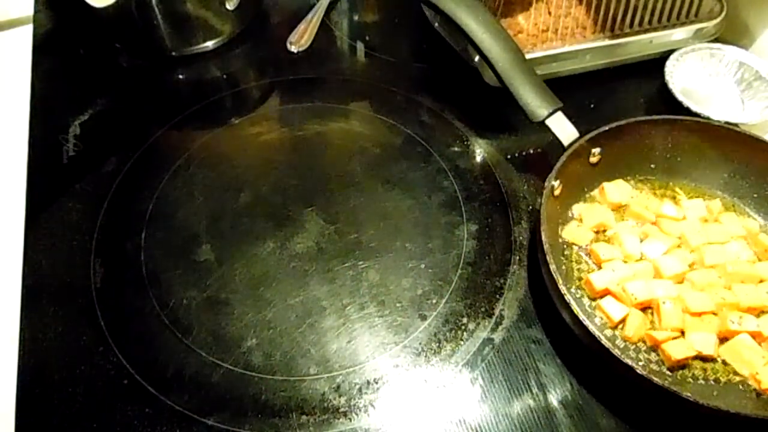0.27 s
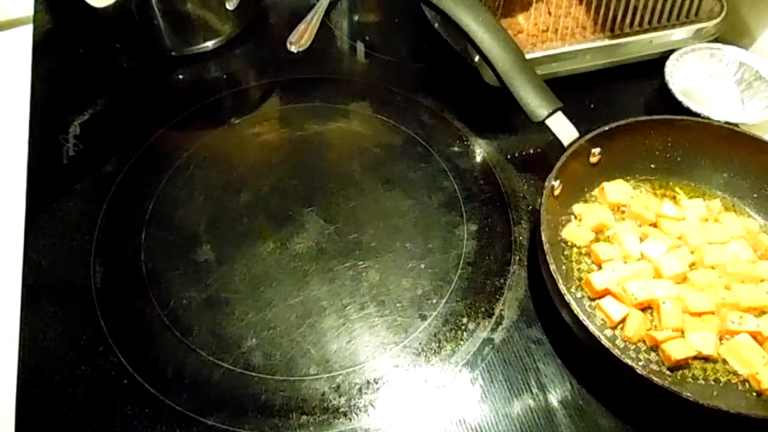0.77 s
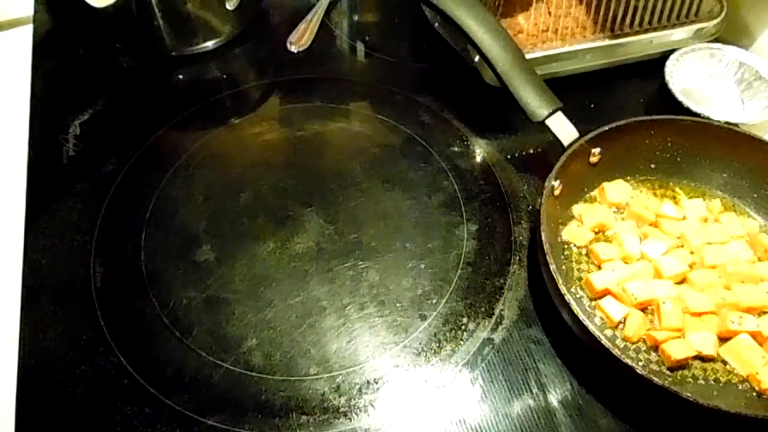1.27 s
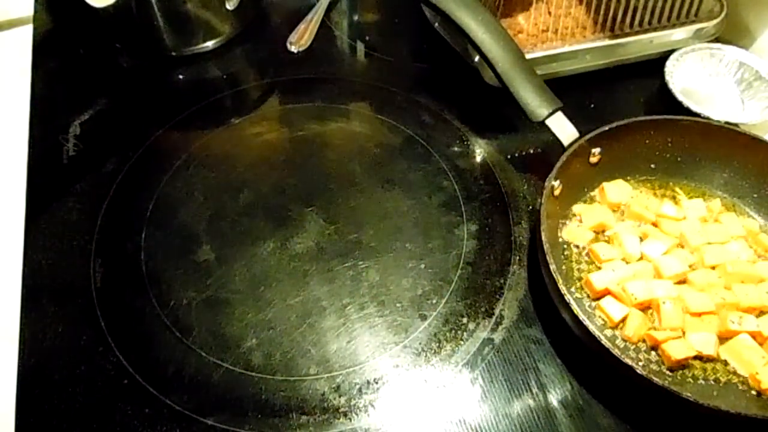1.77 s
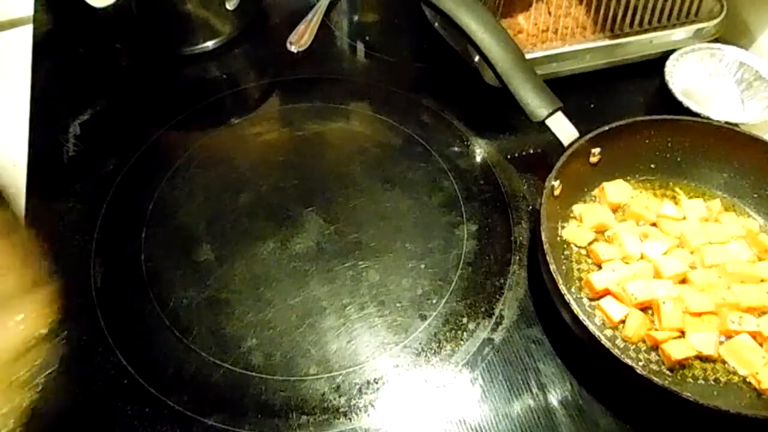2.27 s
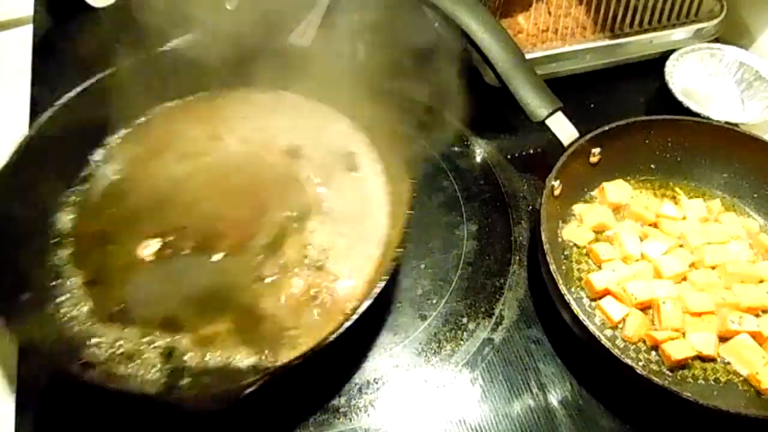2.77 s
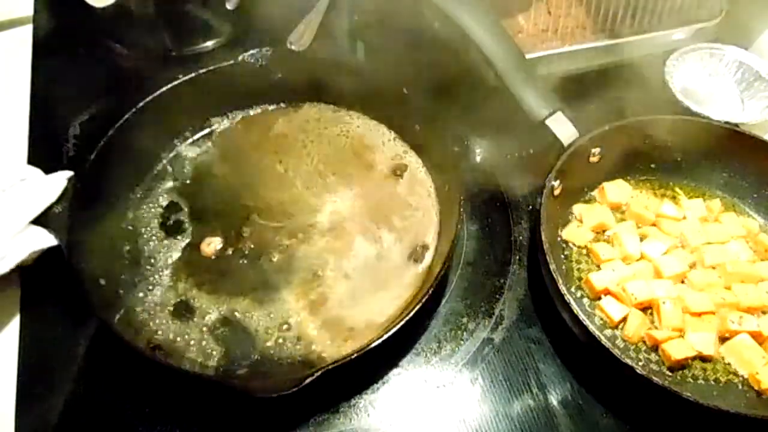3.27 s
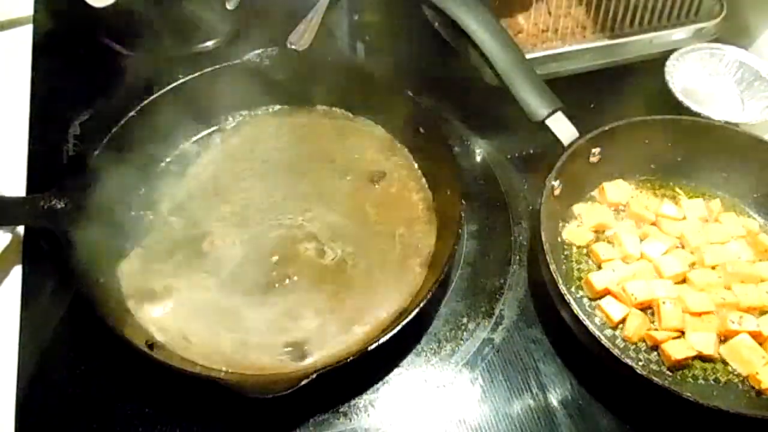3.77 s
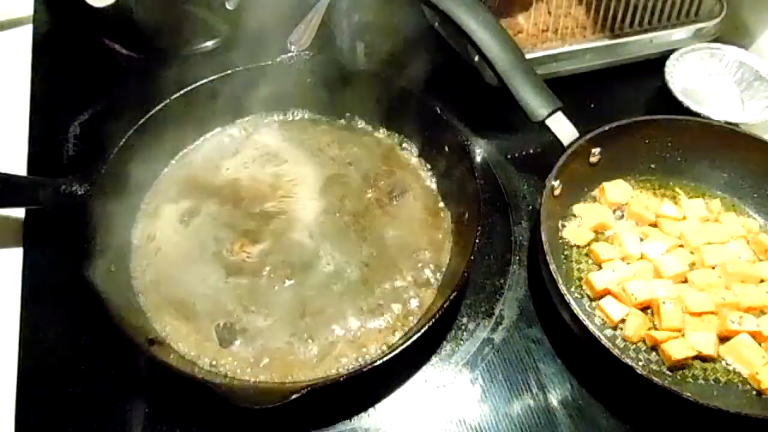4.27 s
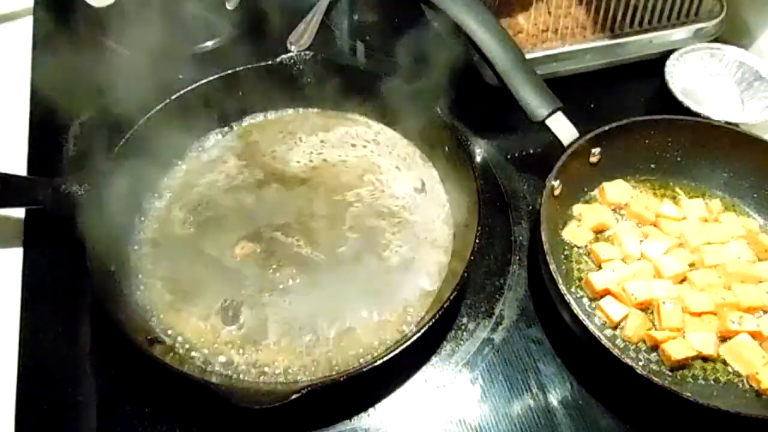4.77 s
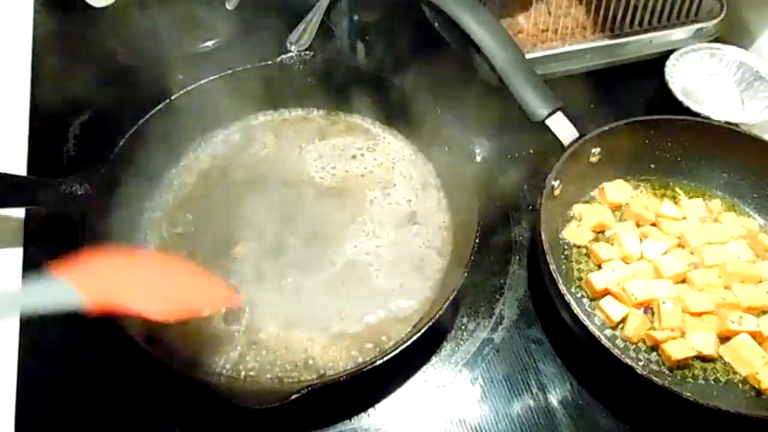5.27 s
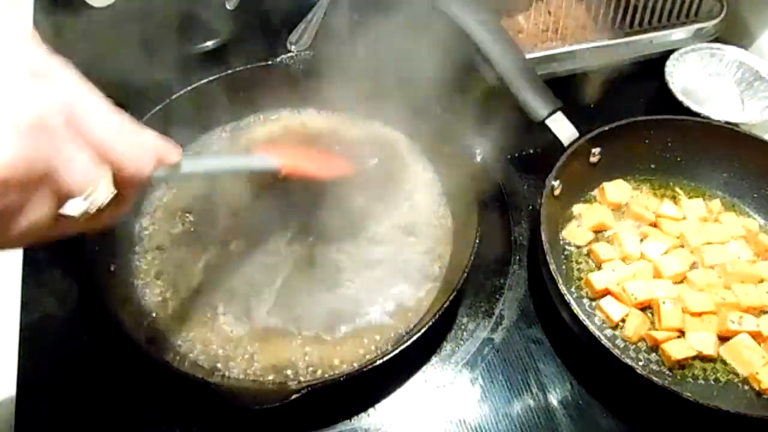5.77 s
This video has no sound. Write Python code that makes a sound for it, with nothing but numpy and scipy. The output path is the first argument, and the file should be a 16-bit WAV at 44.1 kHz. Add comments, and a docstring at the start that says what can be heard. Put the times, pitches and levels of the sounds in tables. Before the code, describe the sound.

From the start, a dense bright hiss and bubbling seethe of water in a very hot iron skillet, crackling with tiny spits, over fine oil ticks from a second pan and a low, wavering fan rumble. Hollow running water sounds until about 1.05 seconds, then stops, with a brief faint gurgle near 1.4. The sizzle weakens a little, then swells around 2.5 as the pan passes close. A very sharp spit cracks at 2.7. At 3.04 the skillet lands on the glass stove with a heavy dull thump; thin high steam squeals follow near 3.2 and a softer second thump at 3.3. Spits continue, the bubbling dips near 3.9 and the hiss gradually dies down. From about 5.2 soft plops mark a spoon; from 5.7 to 6 stirring brings short hiss flares and a small squeal. Close, dry, slight small-room echo, both channels identical.

```python
"""Water hisses and spits on a very hot iron skillet, above frying in a second pan and a droning fan.
Running water sounds hollow until it is shut off; the skillet then lands on a glass stove with two main thumps.
Steam squeals, the hiss dies down and a soft spoon starts to stir.
Hiss and spits are shaped noise, bubbles are random clicks, thumps are ringing tones of the stove top.
One close microphone, the same in both channels, with a gain control that recovers slowly."""
import sys
import numpy as np
from scipy import signal
from scipy.fft import rfft, irfft
from scipy.io import wavfile
from scipy.ndimage import uniform_filter1d

SR = 44100
rng = np.random.default_rng(int(sys.argv[2]) if len(sys.argv) > 2 else 0)


def dump(signal):
    """Clip the signal to [-1, 1] and save it as 16-bit WAV at the path in sys.argv[1]."""
    limited = np.clip(np.atleast_2d(signal).T, -1, 1)
    pcm = np.round(limited * 32767).astype(np.int16)
    wavfile.write(sys.argv[1], SR, pcm)


N = 264847
TIME = np.arange(N) / SR

# the pan starts to be lowered; a little later the boil starts to cool
LOWERED_S, COOLING_STARTS_S = 2.57, 2.88
# the pan swings close: when and for how long
PASS_AT_S, PASS_S = 2.46, 0.27
# the water is shut off: when, and how long the flow takes to stop
SHUT_S, SHUTTING_S = 1.05, 0.053


def gain_of(db):
    """Turns decibels into a factor."""
    return 10 ** (np.asarray(db) / 20)


def evened(x):
    """Scales a signal to an average strength (rms) of one."""
    return x / np.sqrt(np.mean(x ** 2) + 1e-20)


def ramp(t, start, length):
    """Rises in a straight line from zero to one."""
    return np.clip((t - start) / length, 0, 1)


def hump(t, at, length):
    """Swells to one and sinks again around a moment."""
    return np.exp(-((t - at) / length) ** 2)


def add(mix, start_s, sound):
    """Mixes a sound in at a time, cutting it off at the end."""
    part = mix[max(round(start_s * SR), 0):][:len(sound)]
    part += sound[:len(part)]


def coloured(x, points):
    """Shapes the spectrum of x by a table of pitch and level, at an rms of one."""
    pitch_hz, level_db = np.transpose(points)
    bins = np.fft.rfftfreq(len(x), 1 / SR)
    shape_db = np.interp(np.log(bins + 1), np.log(pitch_hz), level_db)
    return evened(irfft(rfft(x) * gain_of(shape_db), len(x)))


def wander(rate, size=N):
    """Smooth random drift of rms one, mostly slower than rate in Hz."""
    bins = np.fft.rfftfreq(size, 1 / SR)
    slow = np.exp(-(bins / rate) ** 2) * (bins > 0)
    return evened(irfft(rfft(rng.standard_normal(size)) * slow, size))


def bursts(per_s, spread_db):
    """Random clicks of bursting bubbles, most small and a few large."""
    size = gain_of(spread_db * np.minimum(rng.exponential(1, N), 5))
    happens = rng.random(N) < per_s / SR
    return evened(size * rng.choice([-1, 1], N) * happens)


def bump(hz, octaves, size):
    """A rounded band around one pitch with gentle skirts, for a sound of this many samples."""
    away = np.log2((np.fft.rfftfreq(size, 1 / SR) + 1) / hz) / octaves
    return evened((1 + (away / 2) ** 2) ** -2)


def puff(db, hz, octaves, rise_s, crack=0):
    """Noise around one pitch that swells and dies, with an optional sharp crack near its start."""
    t = np.arange(SR // 5) / SR
    band = bump(hz, octaves, len(t))
    u = t / max(rise_s, 1e-4)
    swell = u * np.exp(1 - u)  # reaches one after rise_s
    rush = irfft(rfft(rng.standard_normal(len(t))) * band, len(t))
    rush = evened(rush * swell) * np.sqrt(np.mean(swell ** 2))
    tick = np.roll(irfft(band, len(t)), 24)
    return gain_of(db) * (rush + crack * tick / tick.max())


def puffs(rows, crack):
    """Plays a table of puffs, each at its own time."""
    out = np.zeros(N)
    for start_s, *shape in rows:
        add(out, start_s, puff(*shape, crack=crack))
    return out


# how hard the water boils while the pan is carried, before cooling and layer levels
# columns: time_s [s], level_db [dB]
BOIL_STRENGTH = [(0, -28.5), (.2, -27), (.5, -30), (.85, -31), (1.15, -33.5), (1.65, -33), (2.25, -30),
                 (2.7, -30.5)]


def vigour(cooling_db=4.5, cooling_s=1.23):
    """Strength of the boil in dB: it goes up and down while carried, then sinks as the iron cools."""
    time_s, level_db = np.transpose(BOIL_STRENGTH)
    cooled = 1 - np.exp(-np.maximum(TIME - COOLING_STARTS_S, 0) / cooling_s)
    return np.interp(TIME, time_s, level_db) - cooling_db * cooled


def sloshing(fed_db=-0.1, pass_db=1.4, lull_at_s=3.93, lull_s=0.26, lull_db=2.5):
    """Level change of the larger bubbles in dB: running water, a close pass, a lull as water slops back."""
    fed = fed_db * (1 - ramp(TIME, SHUT_S, SHUTTING_S))
    lull = lull_db * hump(TIME, lull_at_s, lull_s)
    return fed + pass_db * hump(TIME, PASS_AT_S, PASS_S) - lull


# resonances of the pan held close, then of the pan on the stove, before their changing shares
# columns: pitch_hz [Hz], width_hz [Hz], boost_db [dB]
HELD_PAN = [(700, 40, 9), (915, 120, 0.5), (1000, 70, 1), (1180, 98, -3), (1333, 72, 8), (1580, 150, 2),
            (1910, 120, -1), (2600, 87, -1.5), (2870, 68, 4), (5670, 130, 1)]
SEATED_PAN = [(430, 45, 5), (780, 76, 10), (1146, 380, -4.5), (1420, 160, 5), (2025, 98, 4), (2670, 450, 3),
              (4600, 880, -3.5), (7870, 180, 12), (9520, 250, 1)]


def hollow(hz, t, near_s=1.0, seating_s=1, held_share=0.94, pass_share=0.46, seated_before=0.4):
    """Pan resonances in dB: the held ones grow as it nears, then give way to the seated ones."""
    shapes = [sum(db / (1 + (2 * (hz - f) / width) ** 2) for f, width, db in modes)
              for modes in (HELD_PAN, SEATED_PAN)]
    down = ramp(t, LOWERED_S, seating_s)
    near = ramp(t, 0, near_s) * held_share + pass_share * hump(t, PASS_AT_S, PASS_S)
    shares = near * (1 - down), seated_before * (1 - down) + down
    return sum(np.outer(shape, share) for shape, share in zip(shapes, shares))


def patchy(x, depth_db, ring=lambda hz, t: 0):
    """Patches of foam swell and fade at their own pitches; ring adds resonances in dB."""
    hz, t, z = signal.stft(x, SR, nperseg=1024, noverlap=768)
    patches = uniform_filter1d(rng.standard_normal(z.shape), size=7, axis=1)  # smooth in time
    patches = uniform_filter1d(patches, size=16, axis=0)  # smooth in pitch
    z = z * gain_of(depth_db * evened(patches) + ring(hz, t))
    return signal.istft(z, SR, nperseg=1024, noverlap=768)[1][:N]


# colour of the fizz of tiny bubbles, then of the seething of larger ones
# columns: pitch_hz [Hz], relative_level_db [dB per Hz]
FIZZ_COLOUR = [(1500, -26.5), (3500, -7), (5200, -3.5), (6500, 0.5), (8000, 1), (9500, 0.2), (11500, -1.5),
               (13000, -4.5), (14500, -11.5), (16000, -19)]
SEETHE_COLOUR = [(120, 0.5), (250, -15.5), (480, -9.5), (750, -6.5), (1100, 0), (1400, -2), (2200, 2),
                 (3200, 1.5), (4500, 2.5), (6500, 0), (11000, -13)]


def boiling(fizz_db=1.0, seethe_db=-4.0, fizz_grain=0.73, seethe_grain=0.71, flash_db=0.5, flash_s=0.004):
    """Countless bubbles burst over a rush of steam, which jumps at random as water touches dry iron."""
    level = vigour()
    fine = fizz_grain * bursts(per_s=7000, spread_db=2.0) + rng.standard_normal(N) * 0.74
    coarse = seethe_grain * bursts(per_s=2500, spread_db=1.5) + rng.standard_normal(N) * 0.62
    fizz = patchy(coloured(fine, FIZZ_COLOUR), depth_db=1.0)
    fizz = fizz * gain_of(level + fizz_db)
    seethe = patchy(coloured(coarse, SEETHE_COLOUR), depth_db=0.85, ring=hollow)
    seethe = seethe * gain_of(level + sloshing() + seethe_db)
    touches = abs(bursts(per_s=45, spread_db=3.0))
    flashes = signal.lfilter([1], [1, -np.exp(-1 / (flash_s * SR))], touches)  # sudden rise, short fade
    return (fizz + seethe) * gain_of(flash_db * evened(flashes - flashes.mean()))


# hollow tones of running water, before the level of the flow
# columns: pitch_hz [Hz], width_hz [Hz], level_db [dB rms]
WATER_TONES = [(458, 19, -55.5), (526, 19, -53.5), (585, 22, -59.5), (840, 37, -59.5)]


def running(flow_db=0.5, gurgle_at_s=1.44, gurgle_s=0.17, gurgle_db=-4):
    """Turbulent water excites narrow, hollow resonances until shut off, then gurgles once more."""
    bins = np.fft.rfftfreq(N, 1 / SR)
    tones = np.zeros(N)
    for hz, width, db in WATER_TONES:
        band = (1 + ((bins - hz) / width) ** 2) ** -2
        tones += gain_of(db) * evened(irfft(rfft(rng.standard_normal(N)) * band, N))
    flow = gain_of(flow_db) * (1 - ramp(TIME, SHUT_S, SHUTTING_S))
    return tones * (flow + gain_of(gurgle_db) * hump(TIME, gurgle_at_s, gurgle_s))


# colour of the oil in the second pan
# columns: pitch_hz [Hz], relative_level_db [dB per Hz]
OIL_COLOUR = [(500, -20), (1500, -11), (4000, -24), (8000, 14.5), (12000, 10), (16000, 8)]


def frying(level_db=-43, scatter=0.28, ring_s=0.0033):
    """Sparse ticks of hot oil, each scattered briefly by the pan wall."""
    t = np.arange(SR // 40) / SR
    tick = scatter * rng.standard_normal(len(t)) * np.exp(-t / ring_s) + (t == 0)
    ticks = signal.oaconvolve(bursts(per_s=260, spread_db=6.0), tick)[:N]
    return gain_of(level_db) * coloured(ticks, OIL_COLOUR)


# colour of the air rumbling through the extractor fan
# columns: pitch_hz [Hz], relative_level_db [dB per Hz]
FAN_RUMBLE = [(8, -14), (24, -0.5), (45, 1.5), (68, -3.5), (95, -0.5), (116, 8), (132, 0), (146, -7.5),
              (190, -17.5), (300, -16.5), (700, -20), (2000, -39)]
# steady tones of the fan, before its overall level
# columns: pitch_hz [Hz], level_db [dB rms]
FAN_TONES = [(83, -59), (96, -54.5), (119.5, -56), (138, -60), (159, -85)]


def fan(waver_hz=0.81, rumble_db=-48, overall_db=1.8):
    """Rumbling air, made of low noise, with a few tones that waver in pitch."""
    tones = np.zeros(N)
    for hz, db in FAN_TONES:
        pitch_hz = hz + waver_hz * wander(rate=3.6)
        tones += gain_of(db) * evened(np.sin(2 * np.pi * np.cumsum(pitch_hz) / SR))
    air = gain_of(rumble_db) * coloured(rng.standard_normal(N), FAN_RUMBLE)
    return (air + tones) * gain_of(overall_db)


def spatter(per_s=12, ends_s=5.2, level_db=-30, spread_db=2.0, centre_hz=8400, octaves=0.59, rise_s=0.0017):
    """Small drops burst into steam at uneven intervals, each with its own strength, pitch, width and speed."""
    rows = []
    draws = rng.uniform(-1, 1, (int(per_s * ends_s), 5))
    for k, (early, loud, high, wide, slow) in enumerate(draws):
        start_s = (k + 1 + early) / per_s
        pitch_hz = centre_hz * 2 ** (.5 * high)
        rows.append((start_s, level_db + spread_db * loud, pitch_hz, octaves * 2 ** wide, rise_s * 2 ** slow))
    return puffs(rows, crack=3.6)


# water flooding fresh hot iron, on its own or pushed by the spoon
# columns: start_s [s], length_s [s], level_db [dB at the peak], pitch_hz [Hz], spread_octaves [octaves]
FLARE_EVENTS = [(0.636, 0.24, -33.5, 4600, 0.63), (.87, .15, -32.5, 5460, .32), (3.17, 0.13, -33, 1790, 2),
                (5.66, 0.18, -32, 6800, 0.53), (5.779, 0.13, -31.5, 5600, 0.58),
                (5.96, 0.1, -31, 7200, 0.46)]


def flares():
    """Water on fresh hot iron gives brief swells of hiss around one pitch."""
    out = np.zeros(N)
    for start_s, length_s, db, hz, octaves in FLARE_EVENTS:
        size = round(length_s * SR)
        hiss = irfft(rfft(rng.standard_normal(SR)) * bump(hz, octaves, SR), SR)
        swell = np.sin(np.linspace(0, np.pi, size))
        add(out, start_s, gain_of(db) * evened(hiss[:size]) * swell)
    return out


# single drops that burst into steam
# columns: start_s [s], level_db [dB of the rush], pitch_hz [Hz], spread_octaves [octaves], rise_s [s]
SPIT_EVENTS = [(0.6464, -27.5, 6440, .6, 0.0095), (0.81, -27, 6460, .75, 0.01),
               (1.4167, -25.5, 7360, .55, .0056), (1.7254, -31, 3900, 0.25, .004),
               (1.8644, -26.5, 7800, .8, 0.0086), (2.0821, -25, 9000, 0.63, .009),
               (2.1952, -28.5, 3000, 1.4, 0.0044), (2.709, -11.5, 9900, 0.4, 0.0021),
               (2.8191, -23, 8850, 0.49, .0024), (2.9441, -24, 11200, .7, 0.003),
               (3.047, -20.5, 6500, 1.5, 0.0035), (3.5832, -23.5, 5900, 1.4, 0.005),
               (3.9074, -24.5, 9100, 1.3, 0.0036), (3.9591, -20, 9600, 0.2, 0.00085),
               (4.3942, -25.5, 4300, 1.7, 0.0035), (4.8016, -25.5, 8900, 0.82, .003),
               (4.8823, -26, 8550, 0.52, 0.0027)]


def spits():
    """Each drop bursts into a short rush of steam with a crack."""
    return puffs(SPIT_EVENTS, crack=2.0)


# soft knocks and plops of handling and stirring
# columns: start_s [s], level_db [dB at the peak], pitch_hz [Hz], spread_octaves [octaves]
PLOP_EVENTS = [(1.86, -46, 486, 0.38), (1.97, -45, 470, .5), (2.198, -39.5, 960, 0.059),
               (5.178, -46, 430, .55), (5.452, -49, 270, 0.3), (5.588, -46, 440, 0.045)]


def plops(rise_s=0.0087):
    """Soft low puffs of noise without a crack."""
    return puffs([(*row, rise_s) for row in PLOP_EVENTS], crack=0)


# the pan meets the stove, rocks and settles with its full weight
# columns: start_s [s], relative_level_db [dB], contact_s [s]
CONTACTS = [(3.043, -2, .0017), (3.153, -21, 0.0056), (3.266, -18, 0.0052), (3.294, -15, 0.0022),
            (3.305, -20.5, 0.0037), (3.31, -10.5, .022)]
# what the stove top rings with, before the contact and the low cut shape it
# columns: pitch_hz [Hz], relative_level_db [dB], fade_s [s to fall by 60 dB]
STOVE_MODES = [(36.8, -18.5, 0.44), (75.4, -23, 0.29), (91.3, 2.5, 0.086), (119, -22, 0.22),
               (142, -16, .14), (172.4, -19.5, 0.22), (196.5, -23, 0.29), (222.6, -21.5, 0.25),
               (266, -15.5, 0.127), (267, -12, 0.066), (343, -32, 0.097), (388, -30, 0.35),
               (446, -24, 0.19), (500, -5, 0.029), (654, -8.5, 0.053), (693, -29, .08), (830, -21, .1),
               (1044, -23, .05)]


def thumps(grit_db=-26, grit_hz=1500, grit_octaves=2.4, grit_rise_s=0.0074, lowest_hz=32, spread_s=0.00077):
    """Each contact pushes the stove top into its modes; longer ones are duller, and iron grates on glass."""
    t, out = np.arange(SR // 2) / SR, np.zeros(N)
    ring = sum(gain_of(db - 60 * t / fade_s) * np.cos(2 * np.pi * hz * t) for hz, db, fade_s in STOVE_MODES)
    ring = ring * (1 - np.exp(-t / spread_s))  # the blow takes a moment to cross the plate
    low_cut = signal.butter(2, lowest_hz, "highpass", fs=SR, output="sos")
    ring = signal.sosfilt(low_cut, ring)  # a plate radiates no slow push
    for start_s, db, contact_s in CONTACTS:
        push = np.sin(np.pi * np.minimum(t / contact_s, 1)) ** 2
        add(out, start_s, gain_of(db) * signal.fftconvolve(ring, push / push.sum())[:len(t)])
        add(out, start_s, puff(db + grit_db, grit_hz, grit_octaves, grit_rise_s))
    return out


# thin squeals of steam squeezed under the pan and the spoon
# columns: start_s [s], length_s [s], level_db [dB rms], pitch_hz [Hz at the top of the arch, before wavering]
SQUEAL_EVENTS = [(3.044, .04, -39.5, 13050), (3.178, .028, -36.5, 12800), (3.21, .032, -33, 12900),
                 (3.237, .045, -33, 12600), (5.818, 0.048, -34.5, 8850), (5.82, 0.078, -39.5, 4170),
                 (5.875, .06, -42, 4490)]


def squeals(waver=0.023, arch_depth=0.0293):
    """Squeezed steam whistles unsteadily; the pitch arches up and back by a share of itself."""
    out = np.zeros(N)
    for start_s, length_s, db, top_hz in SQUEAL_EVENTS:
        arch = abs(np.sin(np.linspace(0, np.pi, round(length_s * SR))))
        unsteady = 1 + waver * wander(rate=730, size=8192)[:len(arch)]
        pitch_hz = top_hz * (1 - arch_depth * (1 - arch)) * unsteady
        swell = np.sqrt(arch) * (1 + .6 * wander(rate=250, size=8192)[:len(arch)])
        whistle = np.sin(2 * np.pi * np.cumsum(pitch_hz) / SR)
        add(out, start_s, gain_of(db) * evened(whistle * swell))
    return out


def rebound(x, strength=0.076, drift_s=.00007):
    """Echoes off stove top, backsplash and hood ripple the spectrum, shifting as the water moves about."""
    delays_s = (.00305, .0043, .0071, .0118, .0163)
    echoes = sum(np.interp(TIME - delay - drift_s * wander(rate=0.53), TIME, x) for delay in delays_s)
    return x + strength * echoes


def kitchen(x, wet_db, fade_s):
    """Adds the short echo of a small room, as fading noise; fade_s is the time to fall by 60 dB."""
    t = np.arange(SR // 3) / SR
    tail = rng.standard_normal(len(t)) * gain_of(-60 * t / fade_s) * (t > .004)
    return x + gain_of(wet_db) * signal.fftconvolve(x, tail / np.linalg.norm(tail))[:N]


def scene():
    """Everything reaches one microphone and fills both channels."""
    events = spatter() + spits() + plops() + thumps() + squeals()
    hiss = rebound(boiling() + flares())
    mono = hiss + running() + frying() + fan() + kitchen(events, wet_db=-13.5, fade_s=.3)
    return np.array([mono, mono])


def record(dry, loud_db=-17.5, deepest_cut_db=4, reaction_s=0.018, recovery_db_per_s=0.76, edge_hz=15900):
    """Gain control turns the level down after a loud peak and creeps back; then the top treble is cut."""
    power_db = 10 * np.log10(abs(uniform_filter1d(dry[0] ** 2, size=180)) + 1e-12)
    asked_db = np.clip(power_db - loud_db, 0, deepest_cut_db)
    creep_db = recovery_db_per_s * TIME
    held_db = np.maximum.accumulate(asked_db + creep_db) - creep_db  # a cut is held, then slowly let go
    lag = np.exp(-1 / (reaction_s * SR))
    ducked = dry * gain_of(-signal.lfilter([1 - lag], [1, -lag], held_db))
    treble_cut = signal.firwin(511, edge_hz, window=("kaiser", 9), fs=SR)
    return signal.oaconvolve(ducked, treble_cut[None], "same")


dry = scene()
out = record(dry)
dump(out)
```